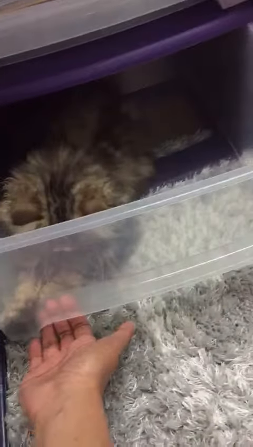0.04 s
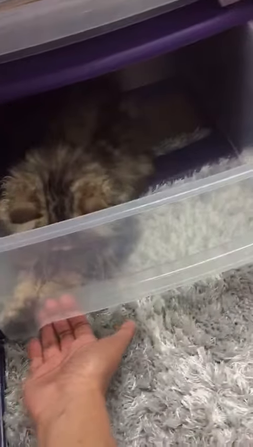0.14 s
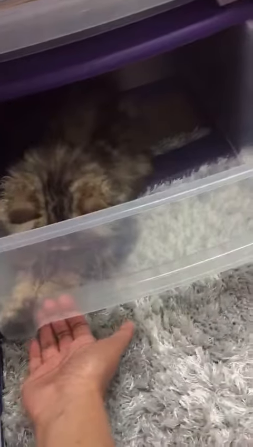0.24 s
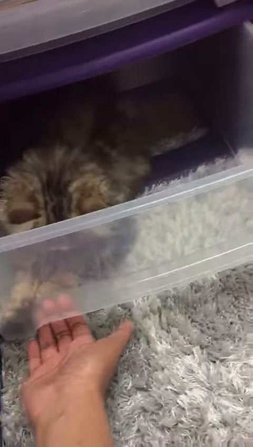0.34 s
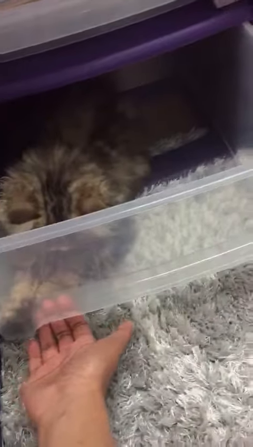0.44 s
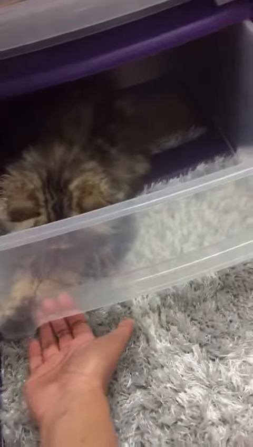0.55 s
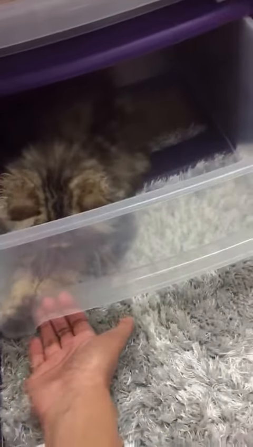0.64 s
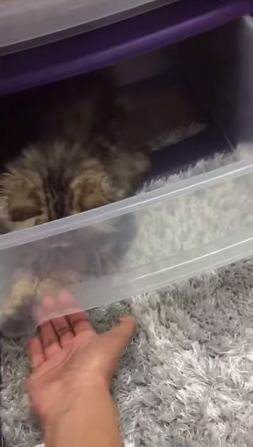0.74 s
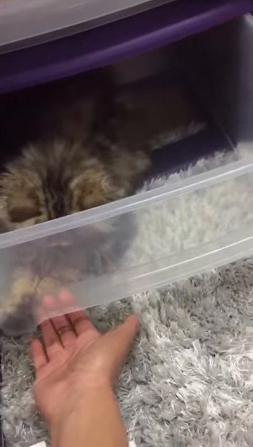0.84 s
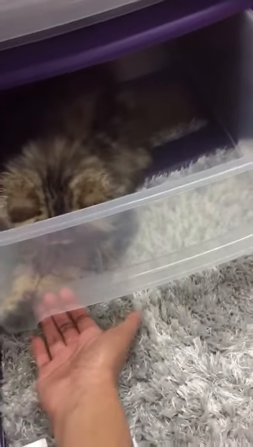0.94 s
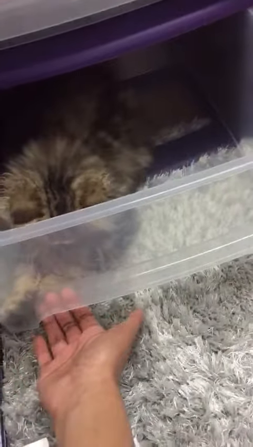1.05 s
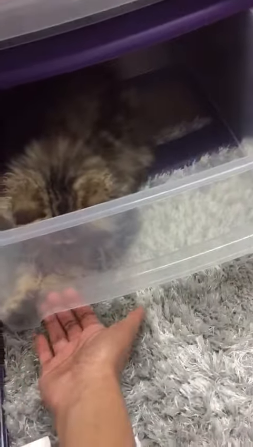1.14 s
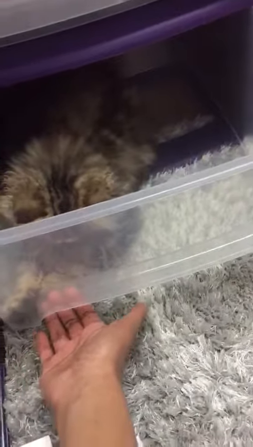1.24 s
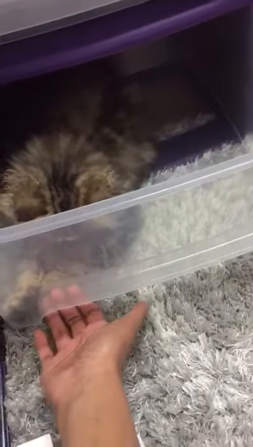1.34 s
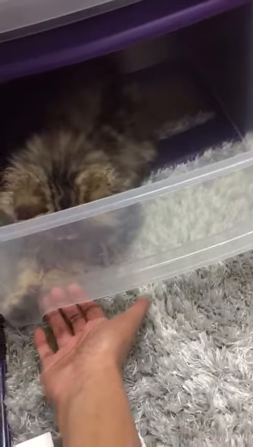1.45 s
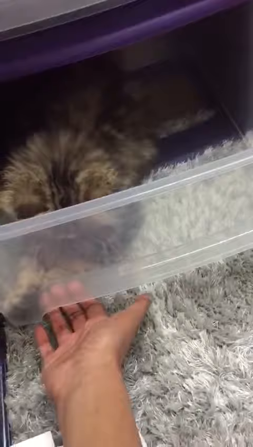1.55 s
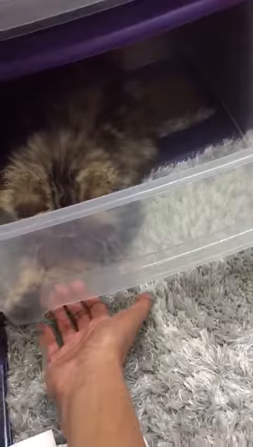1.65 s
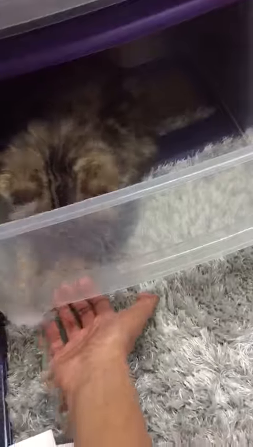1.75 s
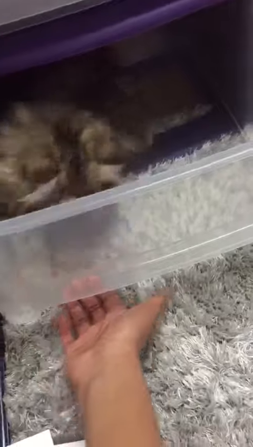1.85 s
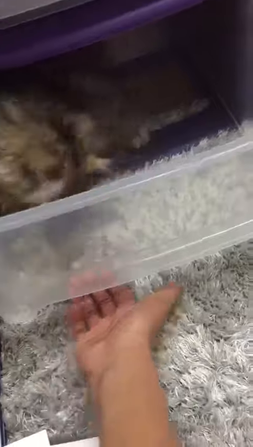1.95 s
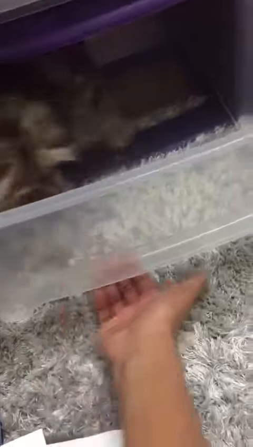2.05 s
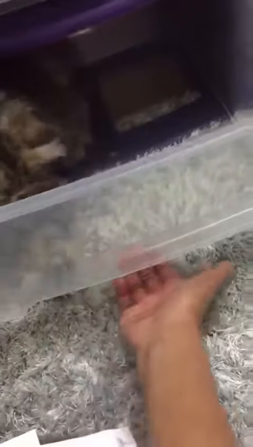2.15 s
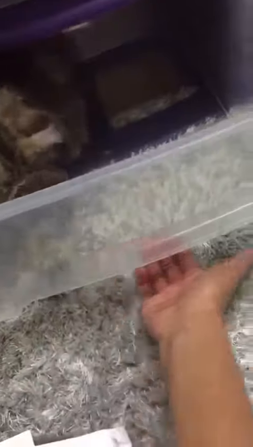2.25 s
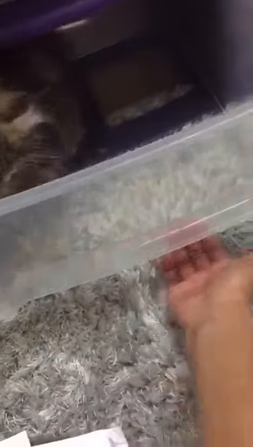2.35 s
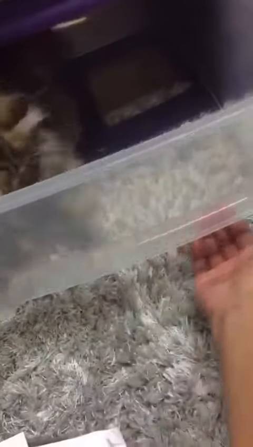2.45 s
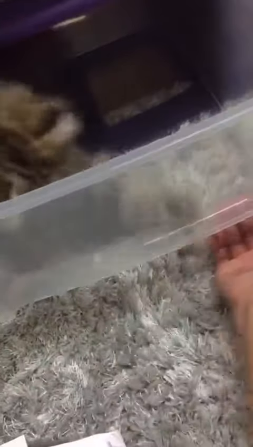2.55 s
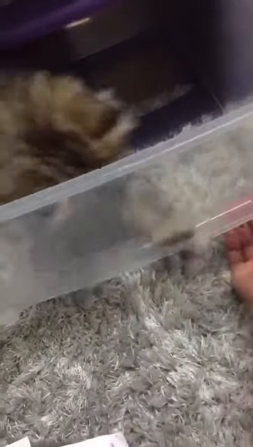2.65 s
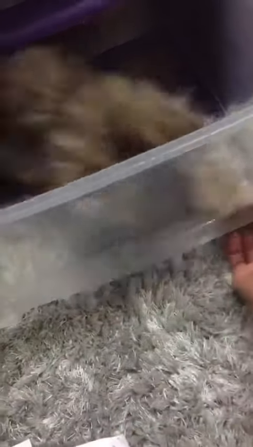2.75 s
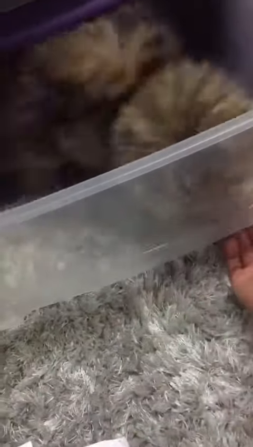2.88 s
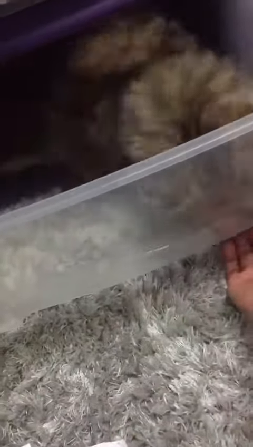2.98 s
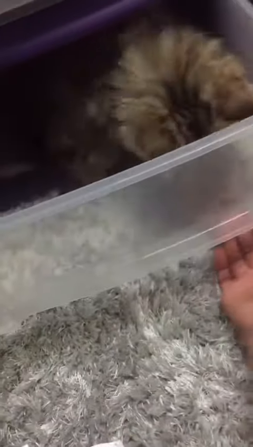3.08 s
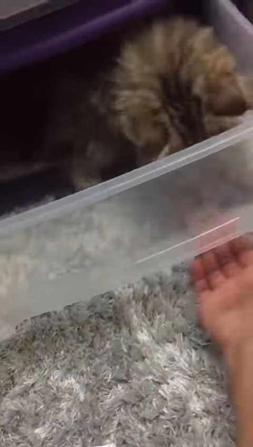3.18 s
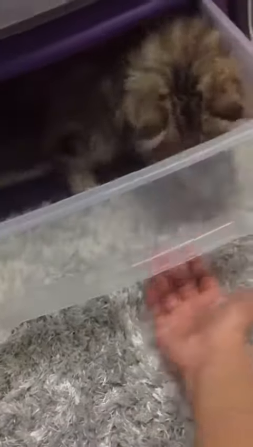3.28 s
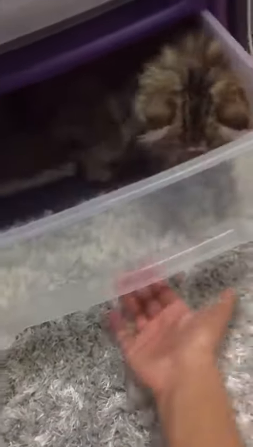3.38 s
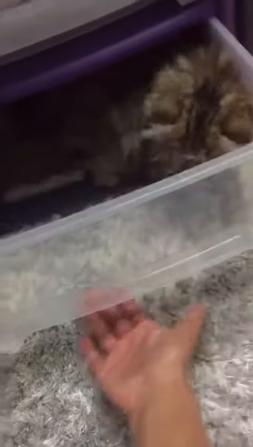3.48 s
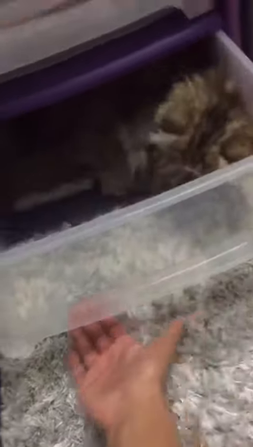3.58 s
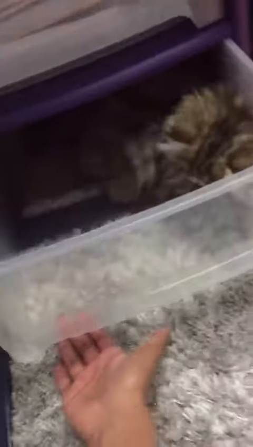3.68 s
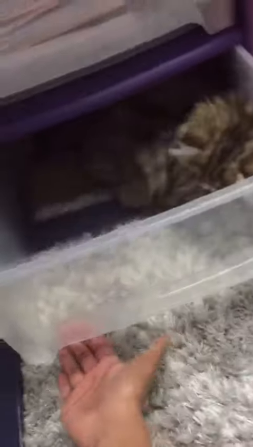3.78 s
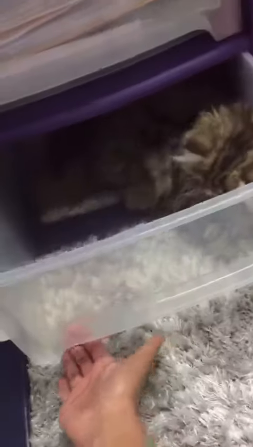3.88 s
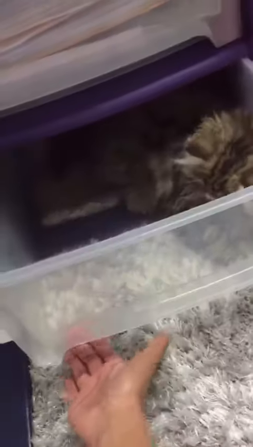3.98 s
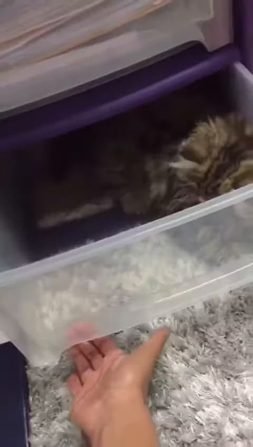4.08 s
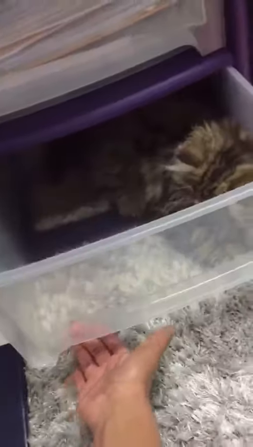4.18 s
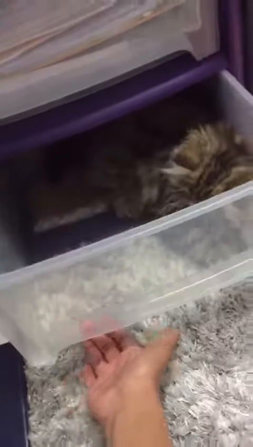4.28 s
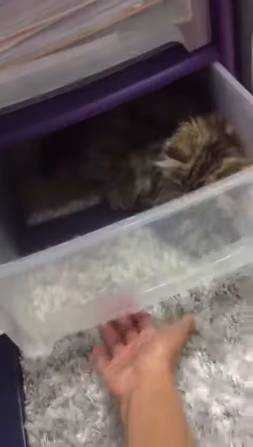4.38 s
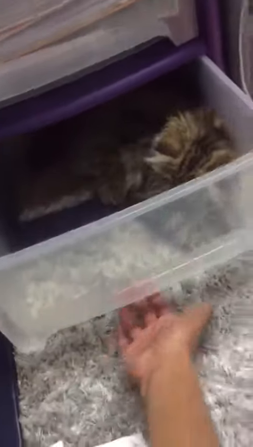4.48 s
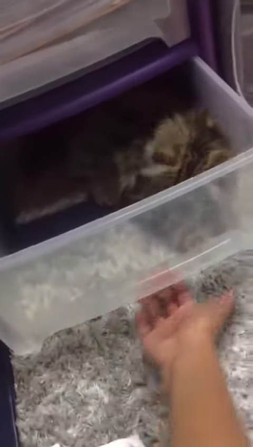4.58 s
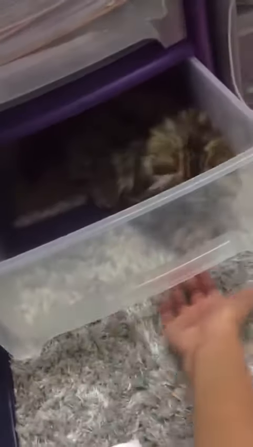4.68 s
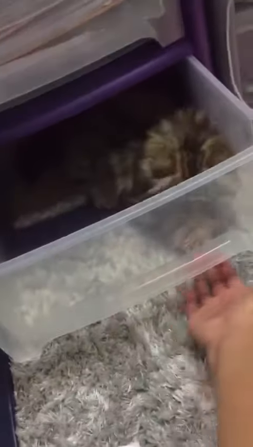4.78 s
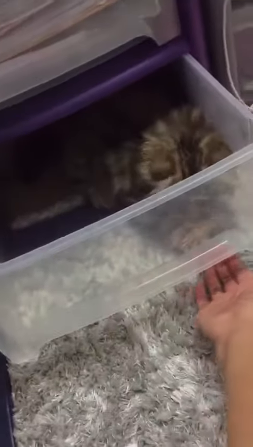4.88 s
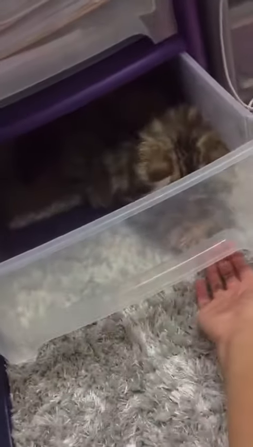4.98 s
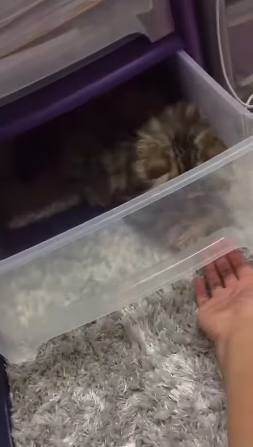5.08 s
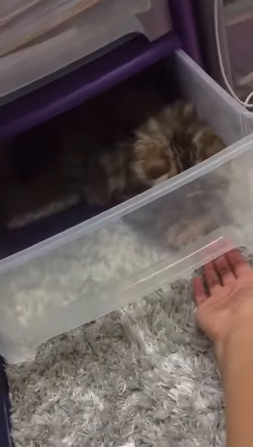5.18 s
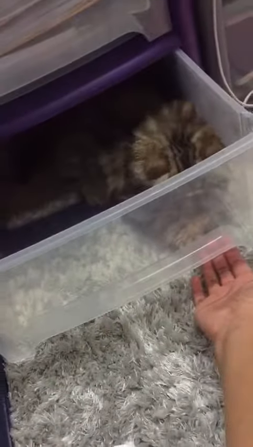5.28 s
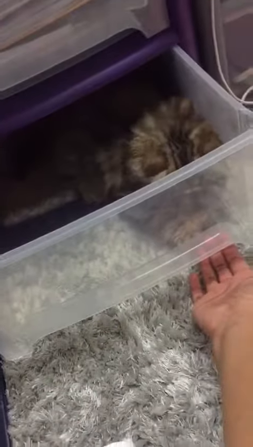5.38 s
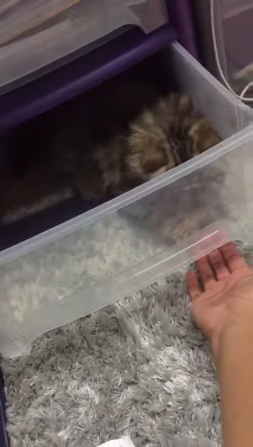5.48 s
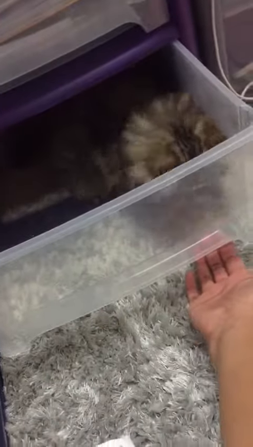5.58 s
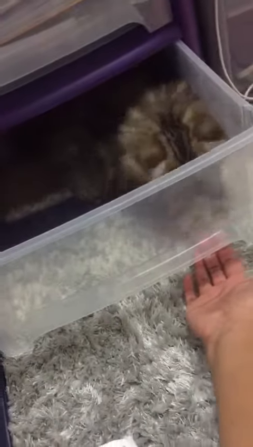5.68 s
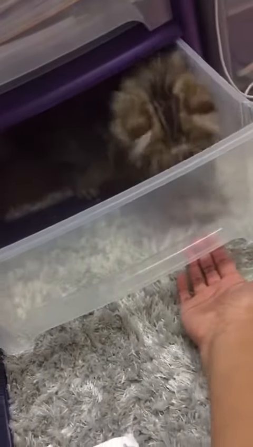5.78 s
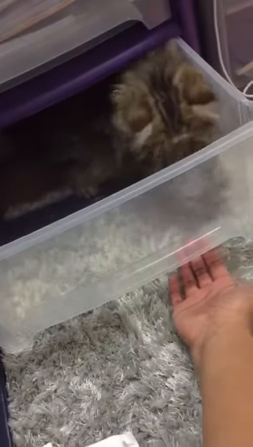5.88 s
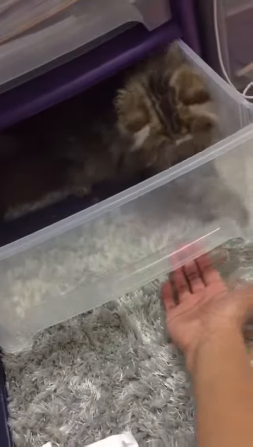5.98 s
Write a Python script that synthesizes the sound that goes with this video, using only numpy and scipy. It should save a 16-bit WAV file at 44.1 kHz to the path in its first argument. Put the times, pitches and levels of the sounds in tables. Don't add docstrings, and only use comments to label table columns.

```python
import sys
import numpy as np
from scipy import signal
from scipy.fft import rfft, irfft
from scipy.io import wavfile
from scipy.ndimage import uniform_filter1d

SR = 44100
rng = np.random.default_rng(int(sys.argv[2]) if len(sys.argv) > 2 else 0)


def gain_from_decibels(decibels):
    exponent = np.asarray(decibels, float) / 20
    return 10 ** exponent


def materialize(psi):
    bounded = np.clip(np.atleast_2d(psi).T, -1, 1)
    quanta = np.round(bounded * 32767).astype(np.int16)
    wavfile.write(sys.argv[1], SR, quanta)


N = 265919
SIZE = 16384
HZ = np.fft.rfftfreq(SIZE, 1 / SR)
T = np.arange(SIZE) / SR


def unit(x):
    return x / np.sqrt(np.mean(x ** 2, axis=-1, keepdims=True) + 1e-20)


def peak_one(x):
    return x / np.abs(x).max(axis=1, keepdims=True)


def along(points, hz):
    f, value = np.transpose(points)
    return np.interp(np.log(hz + 1), np.log(f + 1), value)


def coloured(x, response):
    return irfft(rfft(x) * response, SIZE)


def white(count):
    return rng.standard_normal((count, SIZE))


def band_pass(centre_hz, width_hz, hz, damping=1):
    loss = 1j * hz * width_hz
    return loss / (centre_hz ** 2 - hz * hz + loss * damping)


def resonances(modes, hz, scatter_db=0):
    centre, width, db = np.transpose(modes)[:, :, None]
    return gain_from_decibels(db.T + scatter_db) @ band_pass(centre, width, hz)


def rings(modes, hz, scatter_db, tune, damping):
    return sum(gain_from_decibels(db + scatter_db[:, [k]]) * band_pass(centre * tune, width, hz, damping)
               for k, (centre, width, db) in enumerate(modes))


def noise(response, patchy_db):
    z = signal.stft(rng.standard_normal(N), nperseg=512)[2]
    field = uniform_filter1d(rng.standard_normal(z.shape), 5, axis=0)
    field = uniform_filter1d(field, 6, axis=1)
    x = signal.istft(z * gain_from_decibels(patchy_db * field / field.std()), nperseg=512)[1][:N]
    return unit(irfft(rfft(x) * response(np.fft.rfftfreq(N, 1 / SR)), N))


def place(times, sounds):
    at = np.round(times * SR).astype(int)[:, None] + np.arange(SIZE)
    return np.bincount(at.ravel(), sounds.ravel(), N + SIZE)[:N]


# t/s, crack level/dB, panel ring/dB re crack,
# treble/dB re crack, clack f/Hz
NAIL_TAPS = [(1.514, -50, 1.5, -12, 2110), (1.6525, -32.5, -1, -15, 1915), (1.7668, -23.5, -2.5, -6, 1967),
             (1.8738, -27.5, -4.5, -17, 1975), (1.9731, -21.5, 3, -4, 2982), (2.167, -24.5, 5.5, -7, 2061),
             (2.218, -36.5, 1, -13.5, 2100), (2.34, -27.5, 7.5, -9, 2028), (2.5317, -17, -2.5, -5, 2030),
             (2.8879, -17.5, -4, -11.5, 1957), (3.1006, -18, -4, -10.5, 1497),
             (3.477, -19.5, 2.5, -9, 1594), (3.708, -17.5, 0, -5.5, 2023), (3.9174, -17.5, -6, -7, 1995),
             (4.1525, -14.5, -6.5, -8, 2022), (4.6402, -28.5, 11, -9, 2730)]
# t/s, crack level/dB, treble/dB re crack, clack f/Hz
CLAW_TICKS = [(1.562, -49, -18, 3160), (1.7033, -46.5, -33.5, 1880), (1.801, -39, -19.5, 3040),
              (1.853, -50.5, -12, 3960), (1.862, -45.5, 5.5, 6520), (1.967, -27.5, -21.5, 2614),
              (1.9827, -28.5, -14.5, 1974), (2.0198, -41.5, -20.5, 2090), (2.0364, -22.5, -16.5, 3060),
              (2.129, -28, -16.5, 3210), (2.391, -54, -2.5, 1950), (2.6179, -22.5, -18.5, 4360),
              (2.6544, -29, -11, 4470), (2.6706, -17.5, -11, 3715), (2.8483, -16.5, -14.5, 4326),
              (2.9733, -42.5, -14, 3040), (3.0016, -38, -26.5, 2160), (3.1437, -40.5, -5.5, 1940),
              (3.7767, -42, -33.5, 2940), (4.2739, -36.5, -19, 1969), (4.4964, -60, -9, 1960),
              (4.8578, -59, -14, 3140), (5.2112, -55.5, -16.5, 2878), (5.639, -31.5, -20, 3090),
              (5.769, -50, -12, 2520), (5.8296, -35.5, -23, 3430), (2.994, -56, 4, 10000),
              (3.004, -52, -2, 7000), (4.429, -54, -14, 3000), (5.8175, -44, -30, 1000),
              (5.8325, -44, -30, 980), (5.824, -48, -30, 950), (5.808, -52, -30, 950),
              (3.4475, -46, -30, 1000), (3.2535, -46, -30, 1080)]
# t/s, crack level/dB, panel ring/dB re crack, upper ring/dB re crack
PAD_LANDINGS = [(0.8641, -60, -2, -6), (1.021, -57, 2, -2), (2.3227, -34.5, -8, -15.5),
                (2.639, -34.5, -1, -8.5), (2.6622, -32, 6, -20), (2.8012, -38, -4, -5),
                (2.8758, -33.5, -1, -4.5), (3.0205, -37, 7, 14), (3.2523, -39.5, -39, -6),
                (3.268, -42, -10, -23.5), (3.2976, -50.5, -9.5, -15.5), (3.447, -41, -2, -4.5),
                (3.8191, -52.5, 9.5, 10.5), (3.993, -40, -0.5, -4), (4.04, -44, 3.5, 3),
                (5.6474, -52.5, 2.5, 9), (5.674, -33, -7, -12), (5.701, -35, -1, -8.5),
                (5.8077, -57, -4, 6.5), (5.8239, -40.5, -5, -3)]
# t/s, crack level/dB, panel ring/dB re crack, upper ring/dB re crack
RINGING_KNOCKS = [(0.6589, -68, 4.5, 1), (1.1357, -68.5, 6.5, 4), (1.1705, -58, 1, -4.5),
                  (2.442, -48.5, 8, -1.5), (2.506, -40, -4, -0.5), (3.0412, -59.5, 3.5, 11.5),
                  (3.3777, -46, -8, 0), (3.8633, -60.5, 4, -14.5), (4.098, -68, 12, 23.5),
                  (4.3655, -62, 4, 14), (4.4111, -43.5, 9, 2.5), (4.4142, -48, 17.5, -1.5),
                  (4.4172, -50, 17.5, 7.5), (4.4585, -65.5, 8.5, 7), (4.4783, -63.5, -8.5, 14),
                  (4.5173, -50, 0, -23.5), (4.565, -68.5, 13, 12), (4.733, -66, 26, 18),
                  (4.768, -54.5, 4, -1), (5.8524, -66, -14.5, 0), (2.0664, -29.5, 8, -3.5),
                  (2.4035, -29.5, -23.5, -11.5), (2.824, -41.5, 3.5, -18.5), (4.297, -35, -7, -5.5),
                  (5.817, -41, -5.5, -2), (4.2746, -57.5, 14, -5)]


def contacts():
    # t/s, crack/dB, panel ring/dB, upper ring/dB, treble/dB, clack f/Hz
    nails = [(s, db, ring_db, ring_db - 4, treble_db, hz) for s, db, ring_db, treble_db, hz in NAIL_TAPS]
    claws = [(s, db, -17.5, -22, treble_db, hz) for s, db, treble_db, hz in CLAW_TICKS]
    pads = [(*row, -30.5, 1722) for row in PAD_LANDINGS]
    knocks = [(*row, -14.5, 2000) for row in RINGING_KNOCKS]
    return np.array(nails + claws + pads + knocks)


# f/Hz, level/dB
CRACK_SPECTRUM = [(350, -24), (750, -10), (1300, 1.5), (1800, -9.5), (2050, -3), (2500, -3), (3100, -5.5),
                  (4200, -6.5), (5000, -7.5), (6300, -5.5), (8000, -12), (11000, -15.5), (14000, -28.5)]


def crack(treble_db):
    tilt_db = 1.526 * (treble_db + 8.5) * np.clip(np.log2((HZ + 1) / 3600), 0, 1)
    grit = coloured(white(len(treble_db)), gain_from_decibels(along(CRACK_SPECTRUM, HZ) + tilt_db))
    length = np.clip(gain_from_decibels(-.25 * (treble_db + 17)), .7, 3)
    landing = (1 - np.exp(-T / (0.000264 * length))) ** 2
    decay = gain_from_decibels(-60 * T / (0.01793 * length)) + gain_from_decibels(-4 - 60 * T / (0.0287 * length))
    return grit * landing * decay


def clack(hz):
    return np.sin(2 * np.pi * hz * T) * (1 - np.exp(-T / 0.00067)) ** 2 * gain_from_decibels(-60 * T * hz / 22)


def with_echo(x):
    delay_s, echo_db = 0.0009663, -15.5
    return peak_one(coloured(x, 1 + gain_from_decibels(echo_db) * np.exp(-2j * np.pi * HZ * delay_s)))


def travel(hz, edge_hz):
    return np.exp(-4j * np.pi * 0.048626 * np.sqrt(hz)) / (1 + 1j * hz / edge_hz) ** 4


# f/Hz, width/Hz, level/dB
PANEL_MODES = [(562, 45, -19), (379.9, 40.44, 7), (402.6, 49, -5.5), (487.2, 24, -4)]
# f/Hz, width/Hz, level/dB
LINGER_MODE = [(392.2, 12, -12.5)]
# f/Hz, width/Hz, level/dB
FRAME_MODES = [(105, 30, -3), (150, 35, 0), (197, 35, 0), (245, 40, -7)]


def panel_ring(tune, damping):
    low = HZ[HZ < 6000]
    scatter_db = 1.5 * rng.standard_normal((len(tune), len(PANEL_MODES)))
    modes = rings(PANEL_MODES, low, scatter_db, tune, damping) + resonances(LINGER_MODE, low) / damping ** 4
    radiation = (1j * low / (250 + 1j * low)) ** 2 * np.exp(-2j * np.pi * low * .0005)
    front = peak_one(irfft(travel(low, 780) * radiation * modes, SIZE))
    scatter_db = 3 * rng.standard_normal((len(tune), len(FRAME_MODES)))
    frame = peak_one(irfft(travel(low, 400) * resonances(FRAME_MODES, low, scatter_db), SIZE))
    return front + gain_from_decibels(-18) * frame


# f/Hz, width/Hz, level/dB
UPPER_MODES = [(630, 38, -21.5), (647.7, 46.5, 6.5), (698.8, 55, 2.5), (813.6, 105, 0), (898.1, 48, 0.5),
               (964.6, 90, -14.5), (1256, 89, -11), (1422, 98, -10)]


def upper_ring(panel_db, upper_db, tune, damping):
    low = HZ[HZ < 6000]
    near_rib = np.clip(upper_db - panel_db, 0, 15)
    scatter_db = 1.5 * rng.standard_normal((len(tune), len(UPPER_MODES)))
    scatter_db -= 1.5 * near_rib * np.abs(np.log2(np.transpose(UPPER_MODES)[0] / 1000))
    modes = rings(UPPER_MODES[:3], low, scatter_db[:, :3], tune, damping)
    modes = modes + resonances(UPPER_MODES[3:], low, scatter_db[:, 3:])
    edge_hz = 2500 * gain_from_decibels(-.7 * np.clip(panel_db - 6.5, 0, 12))
    return peak_one(irfft(travel(low, edge_hz) * modes, SIZE))


# f/Hz, t60/s
ROOM_DECAY = [(300, 0.1717), (1000, 0.17), (3000, 0.097), (6000, 0.1335), (11000, 0.1289)]


def with_room(sounds):
    wet_db, gap_s = -12.5, 0.0083
    hz, t, z = signal.stft(rng.standard_normal(sounds.shape), SR, nperseg=256)
    decay = gain_from_decibels(-60 * t / along(ROOM_DECAY, hz)[:, None])
    tail = signal.istft(z * decay, SR, nperseg=256)[1][:, :SIZE]
    tail = unit(tail * np.clip(T / gap_s, 0, 1) ** 2 * (T < .8 * T[-1])) / np.sqrt(SIZE)
    return sounds + gain_from_decibels(wet_db) * coloured(sounds, rfft(tail))


# t/s, panel f/Hz, upper f/Hz, damping factor, clack level/dB
HAND_GRIP = [(1.514, 380, 655, 1, -5), (1.65, 377, 600, 1.1, -7), (1.77, 380, 605, 1.1, -10),
             (1.87, 377, 590, 1.1, -8), (1.97, 380, 660, 1, -7), (2.07, 380, 620, 1.1, -5),
             (2.17, 382, 655, 1.1, -7), (2.34, 380, 620, 1.2, -7), (2.53, 377, 662, 1.2, -10),
             (2.67, 376, 610, 1.2, -6), (2.89, 382, 620, 1.2, -9), (3.02, 365, 612, 1.1, -6),
             (3.1, 373, 621, 1.4, -6), (3.25, 378, 640, 1.2, -6), (3.48, 382, 662, 1.2, -7),
             (3.71, 380, 660, 1.1, -9), (3.92, 380, 658, 1.1, -5), (4.15, 378, 658, 1.3, -3),
             (4.41, 370, 646, 1.2, -6), (4.64, 385, 640, 1, -6), (5.67, 365, 600, 1.2, -6)]


def taps():
    s, db, panel_db, upper_db, treble_db, clack_hz = contacts().T[:, :, None]
    grip_s, *grip = np.transpose(HAND_GRIP)
    panel_hz, upper_hz, damping, clack_db = (np.interp(s, grip_s, column) for column in grip)
    burst = with_echo(crack(treble_db))
    knock = gain_from_decibels(clack_db) * with_echo(clack(clack_hz))
    top = np.abs(burst + knock).max(axis=1, keepdims=True)
    panel = panel_ring(panel_hz / 380, damping)
    upper = upper_ring(panel_db, upper_db, upper_hz / 648, damping)
    panel_gain = gain_from_decibels(panel_db + 3.5)
    upper_gain = gain_from_decibels(upper_db + 3.5 - .5 * np.clip(panel_db - 7, 0, 8))
    hit = gain_from_decibels(db) * (burst / top - panel_gain * panel - upper_gain * upper)
    return place(s[:, 0], with_room(hit) + gain_from_decibels(db) * knock / top)


# t/s, peak level/dB, f/Hz, floor-panel share/dB
HARD_JOLTS = [(1.024, -38.5, 129.2, -7.5), (1.135, -45, 127.3, -5.5), (1.171, -46, 138.8, -11),
              (1.735, -39.5, 159, -12.5), (1.887, -42, 123.4, -11), (2.219, -33.5, 120, -35.5),
              (2.326, -27.5, 142.9, -9.5), (2.619, -20, 137.2, -5), (2.675, -21.5, 122.2, -12.5),
              (2.8496, -21, 150.7, 0), (3.053, -25.5, 104, -14), (3.924, -32, 117.8, -26.5),
              (4.369, -30.5, 115.4, -3.5), (4.416, -32.5, 103.6, -7.5), (4.648, -35, 116.8, -6.5),
              (4.891, -53.5, 85.8, -27.5), (5.702, -26.5, 118.4, -9.5), (5.754, -45, 86, -20.5),
              (1.664, -47.5, 112, -11), (2.13, -42.5, 121, -12.5), (3.021, -38, 140, -3),
              (2.925, -38, 150, -3), (2.607, -38, 125, -20), (2.829, -37, 120, -12), (2.733, -42, 125, -20),
              (3.716, -38, 150, -8), (2.043, -38, 135, -12), (3.108, -33, 135, -5), (3.994, -38, 120, -8),
              (4.214, -44, 110, -8), (4.435, -38, 110, -10), (1.065, -50, 125, -10), (2.794, -40, 150, -10)]
# t/s, peak level/dB, f/Hz, floor-panel share/dB
ROCKING_PUSHES = [(1.997, -36.5, 135.8, -17.5), (2.068, -36, 135, -5), (2.448, -40.5, 92.3, -24.5),
                  (2.54, -37, 129, 0), (2.64, -30, 127.9, -15.5), (2.864, -20.5, 106, -8),
                  (2.883, -34, 106, 3), (3.164, -43.5, 110.3, -4.5), (3.388, -43, 89.5, -29.5),
                  (3.484, -37.5, 119.8, -24), (3.736, -40.5, 95, -14), (3.816, -37.5, 108.6, -3.5),
                  (3.859, -38.5, 101.7, -6), (3.963, -36.5, 106, -1), (4.044, -36.5, 103.7, -4),
                  (4.104, -37.5, 123.5, 0.5), (4.157, -40, 116.2, -1.5), (4.296, -34, 106, -2.5),
                  (4.585, -51, 100, -4.5), (4.786, -52.5, 111, -24), (5.6746, -31.5, 119.4, -1.5)]
RAIL_CATCHES = [1.045, 2.255, 2.36, 2.7, 2.908, 3.085, 3.9, 4.02, 4.09, 4.355, 4.405, 4.452, 5.735, 7]


def jolts():
    s, db, hz, floor_db = np.transpose(list(HARD_JOLTS) + list(ROCKING_PUSHES))[:, :, None]

    def kind(jolt, push):
        return np.repeat([jolt, push], [len(HARD_JOLTS), len(ROCKING_PUSHES)])[:, None]

    rise_s, t60_s, floor_t60_s = kind(.0026, .0035), kind(0.0833, 0.159), kind(.08, .11)
    friction = gain_from_decibels(-60 * (T / t60_s) ** 1.35)
    grip_s = np.array(RAIL_CATCHES)[np.searchsorted(RAIL_CATCHES, s)]
    caught = gain_from_decibels(-450 * np.clip(s + T - grip_s, 0, None))
    swing = np.sin(2 * np.pi * hz * T) * friction * caught
    load = 1 + .025 * rng.standard_normal((len(s), 2, 1))
    floor_panel = np.sin(2 * np.pi * 245 * load[:, 0] * T)
    side_panel = np.sin(2 * np.pi * 190 * load[:, 1] * T)
    answer = (floor_panel + side_panel) * gain_from_decibels(floor_db - 60 * T / floor_t60_s)
    return place(s[:, 0], gain_from_decibels(db + 6.5) * (1 - np.exp(-T / rise_s)) * (swing + answer))


def friction_noise(hz, width, order):
    slips = gain_from_decibels(3.5 * unit(uniform_filter1d(white(len(hz)), 120, axis=1)))
    return unit(coloured(slips * white(len(hz)), band_pass(hz, width, HZ) ** order))


def rub_along(rows):
    s, length, db, hz, width = np.transpose(rows)[:, :, None]
    swell = np.sin(np.pi * np.clip(T / length, 0, 1)) ** .35
    return place(s[:, 0], gain_from_decibels(db) * swell * (T < length) * friction_noise(hz, width, 2))


# t/s, fade of 30 dB/s, level/dB, f/Hz, width/Hz
SKIDS = [(1.655, 0.0775, -49, 1300, 1500), (2.803, 0.0248, -41.5, 800, 1400),
         (2.892, 0.0562, -42, 900, 1500), (3.022, 0.04, -35, 1200, 1590), (2.806, 0.03, -46, 600, 300),
         (3.925, 0.07, -44.5, 1204, 1800), (3.998, 0.0629, -52.5, 900, 1200),
         (4.156, 0.055, -44, 1700, 2000), (4.3, 0.07, -46.5, 997, 1600), (5.676, 0.0371, -46.5, 2000, 2500),
         (5.703, 0.0627, -52, 2500, 3000), (3.482, 0.065, -44, 1000, 1400),
         (4.645, 0.0828, -58, 3000, 3000), (2.345, 0.2267, -55, 1200, 2000),
         (2.675, 0.0269, -47.5, 3500, 3000), (4.158, .06, -56, 4000, 4000), (2.537, .05, -56, 4100, 1500),
         (3.106, .06, -55, 5500, 4000), (3.482, .07, -56, 6500, 4000), (1.775, .06, -58, 3000, 3000),
         (4.65, .1, -55, 860, 200), (3.712, .06, -59, 5500, 4000)]


def scuffs():
    s, fade, db, hz, width = np.transpose(SKIDS)[:, :, None]
    swell = (1 - np.exp(-T / .0015)) * gain_from_decibels(-30 * T / fade)
    return place(s[:, 0], gain_from_decibels(db) * swell * (T < fade) * friction_noise(hz, width, 4))


# t/s, length/s, level/dB, f/Hz, width/Hz
PAD_SLIDES = [
    (2.625, .04, -56, 1750, 2600),
    (2.856, .03, -53.5, 1500, 2500),
    (1.636, 0.0184, -61.5, 1230, 1700),
    (5.626, 0.0152, -64, 2350, 2500),
    (3.685, .024, -62.5, 1200, 1500),
    (3.23, 0.023, -63.5, 1230, 1300),
    (3.7, 0.039, -68.5, 3770, 520),
    (2.83, .018, -46, 250, 245),
]


def slides():
    return rub_along(PAD_SLIDES)


# t/s, length/s, level/dB, f/Hz, width/Hz
WALL_STROKES = [(1.849, 0.0232, -52, 6500, 16400), (2.005, 0.046, -59.5, 2250, 1860),
                (2.455, 0.045, -66, 1943, 90), (2.63, 0.1126, -65, 3400, 1900),
                (2.4, 0.041, -66, 2920, 830), (2.80, 0.0355, -48.5, 1520, 1360),
                (2.855, 0.027, -60, 2900, 2460), (2.99, 0.013, -70, 2600, 2000),
                (3.34, 0.07, -64, 1200, 1500), (2.998, .012, -58, 2800, 2500), (3.67, .025, -68, 2000, 500),
                (4.044, 0.025, -57.5, 1400, 680), (4.385, 0.0465, -67.5, 3194, 265),
                (4.386, 0.025, -68.5, 4220, 300), (4.284, 0.0365, -58.5, 1540, 1000),
                (2.2, 0.0455, -61, 2700, 3750), (4.54, 0.14, -71, 2200, 5900), (3.3, 0.22, -74, 2000, 3000),
                (5.642, 0.121, -67, 2600, 2370), (5.812, 0.03, -61, 3000, 2400),
                (2.318, 0.021, -57.5, 1430, 3050)]


def wall_strokes():
    return rub_along(WALL_STROKES)


# t/s, length/s, level/dB, treble slope/dB per octave
RIM_SWEEPS = [
    (3.33, .105, -61, -1.5),
    (3.582, .05, -67, -5),
    (3.63, .06, -72, 0),
    (3.072, .028, -66, 0),
    (4.375, .045, -69, -6),
]
# f/Hz, width/Hz, level/dB
RIM_MODES = [(2750, 300, -2), (3700, 400, 0), (4400, 300, -1.5), (5150, 400, 0), (6360, 450, 0),
             (8300, 600, -3), (9700, 800, -2.5), (11300, 600, -2.5)]


def sweeps():
    s, length, db, slope_db = np.transpose(RIM_SWEEPS)[:, :, None]
    colour = np.abs(resonances(RIM_MODES, HZ)) ** 1.6 * gain_from_decibels(slope_db * np.log2((HZ + 1) / 4000))
    swell = np.sin(np.pi * np.clip(T / length, 0, 1) ** .7) ** .6
    return place(s[:, 0], gain_from_decibels(db) * swell * (T < length) * unit(coloured(white(len(s)), colour)))


# t/s, length/s, level/dB, f/Hz
FUR_SQUEAKS = [
    (0.212, 0.076, -78, 1574),
    (0.346, 0.071, -78.5, 1352),
    (.68, 0.083, -77, 529),
    (.78, 0.067, -75, 1486),
    (0.921, 0.055, -77.5, 1865),
    (0.98, 0.081, -74.5, 1237),
    (1.433, 0.078, -73.5, 602.5),
    (4.869, 0.058, -78.5, 1790),
]


def squeaks():
    return rub_along([(*row, 60) for row in FUR_SQUEAKS])


# t/s, level/dB
LEAN = [(0.8, -82.5), (1.06, -63.5), (1.45, -78.5), (1.72, -54), (2.26, -49), (2.5, -57.5), (2.854, -45),
        (3.12, -46.5), (3.22, -56), (3.36, -49.5), (3.7, -60.5), (3.98, -48), (4.33, -53), (4.46, -67.5),
        (4.66, -51.5), (4.88, -76), (5.6, -80), (5.8, -53)]


def lean_level():
    t = np.arange(N) / SR
    return np.interp(t, *np.transpose(LEAN)) - 190 * np.clip(t - LEAN[-1][0], 0, None)


# f/Hz, width/Hz, level/dB
BODY_MODES = [(62.1, 6.16, 4), (106, 15, -14.5), (147, 54, -18), (182.85, 7.3, -7.5)]


def sway():
    return gain_from_decibels(lean_level()) * noise(lambda hz: resonances(BODY_MODES, hz)[0], patchy_db=1.5)


# t/s, peak level/dB, fade of 20 dB/s
FOOTING = [(1.698, -63, 0.7), (2.022, -52.5, 0.18), (2.41, -52, 0.1443), (2.632, -49, 0.04),
           (2.87, -58.5, 0.57), (3.3, -57.5, 0.5), (3.422, -54, 0.1467), (3.55, -55, 0.324),
           (3.76, -49.5, 0.143), (3.96, -50, 0.0553), (4.23, -60, 0.3663), (4.32, -54.5, 0.193),
           (4.72, -61, 0.2963), (5.74, -63, 0.18), (5.84, -64, 0.15)]


def shuffle():
    rise_s, rest_db = .09, -82
    t = np.arange(N) / SR
    shifts = [db - 20 * np.maximum((s - t) / rise_s, (t - s) / fade) for s, db, fade in FOOTING]
    level_db = np.maximum(np.max(shifts, axis=0), rest_db)

    def shell(hz):
        panel = resonances(list(PANEL_MODES) + [(268, 30, 0.5)], hz)[0]
        upper = gain_from_decibels(-5) * resonances(UPPER_MODES, hz)[0]
        return panel + upper + gain_from_decibels(-27) * (hz > 300) / (1 + (hz / 3000) ** 2)

    return gain_from_decibels(level_db) * noise(shell, patchy_db=5.5)


# f/Hz, level/dB per Hz
MID_HISS_SPECTRUM = [(880, -4.5), (1500, -1), (3020, -2.5), (3300, -5), (3550, -4.5), (7670, -10.5),
                     (11100, -22), (12500, -50.5), (16200, -46), (22000, -120)]


def mid_hiss():
    hiss_db = -74 - 0.48 * np.clip(lean_level() + 65.5, 0, None)
    return gain_from_decibels(hiss_db) * noise(lambda hz: gain_from_decibels(along(MID_HISS_SPECTRUM, hz)), patchy_db=2)


# f/Hz, level/dB per Hz
AIR_SPECTRUM = [(15, -50.5), (25, -8), (102, 0.5), (126, -7.5), (159, -7), (241, -18), (297, -17.5),
                (330, -18.5), (685, -22), (843, -25), (1350, -27), (1800, -47), (9040, -34.5), (11400, -36),
                (12700, -37.5), (16500, -77), (22000, -120)]


def room_air():
    lean_db = np.interp(np.arange(N) / SR, *np.transpose(LEAN), right=-70) + 70
    smooth_db = uniform_filter1d(np.clip(lean_db, 0, None), size=SR // 10)
    return gain_from_decibels(-66 - .15 * smooth_db) * noise(lambda hz: gain_from_decibels(along(AIR_SPECTRUM, hz)), patchy_db=2)


def scene():
    friction = scuffs() + slides() + wall_strokes() + sweeps() + squeaks()
    motion = sway() + shuffle() + mid_hiss()
    return (taps() + jolts() + friction + motion + room_air())[None]


def roll_off(x):
    return signal.sosfilt(signal.butter(12, 12830, fs=SR, output="sos"), x)


def record(dry):
    bass_cut = signal.butter(2, 50, "high", fs=SR, output="sos")
    treble_cut = signal.butter(16, 11700, fs=SR, output="sos")
    mix = signal.sosfilt(np.vstack([bass_cut, treble_cut]), dry)
    return roll_off(mix)


dry = scene()
out = record(dry)
materialize(out)
```